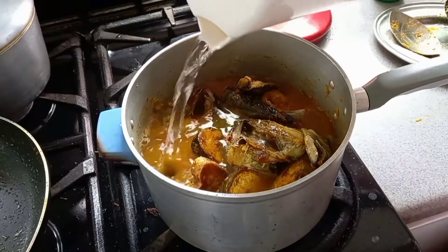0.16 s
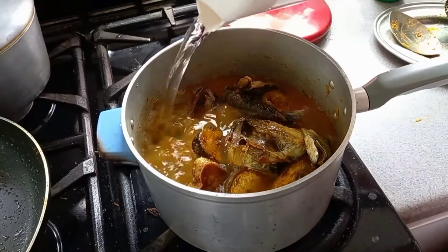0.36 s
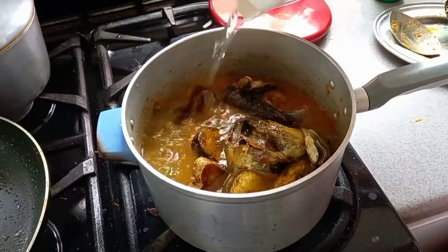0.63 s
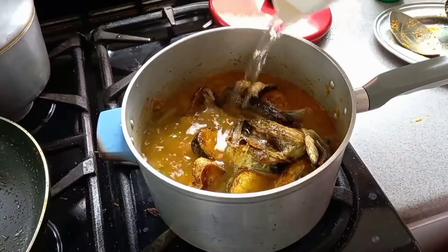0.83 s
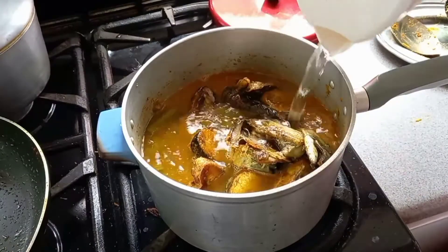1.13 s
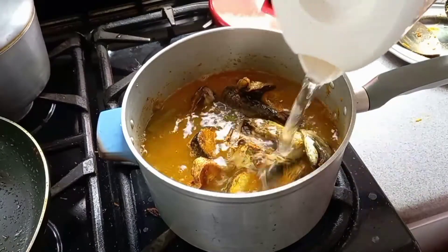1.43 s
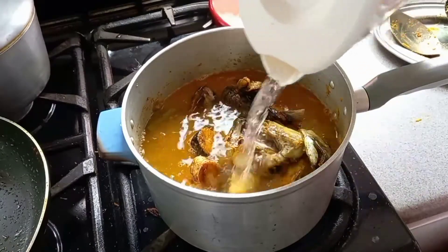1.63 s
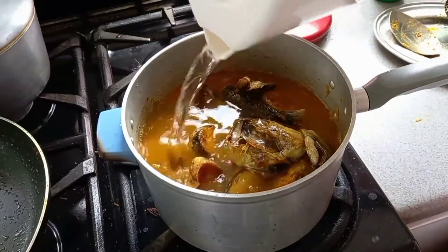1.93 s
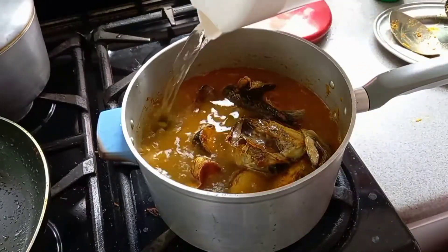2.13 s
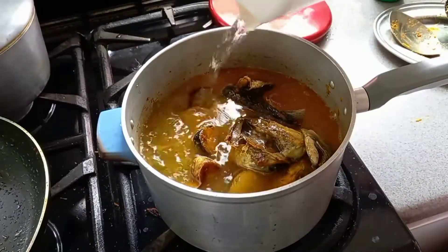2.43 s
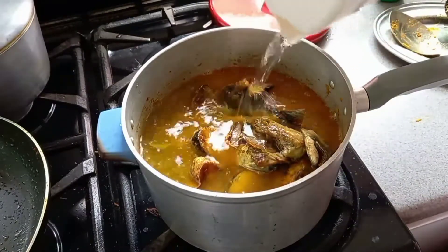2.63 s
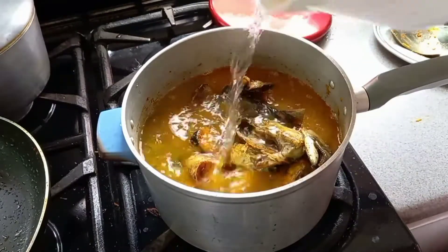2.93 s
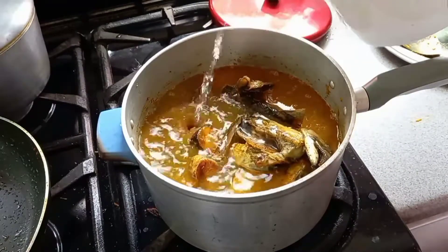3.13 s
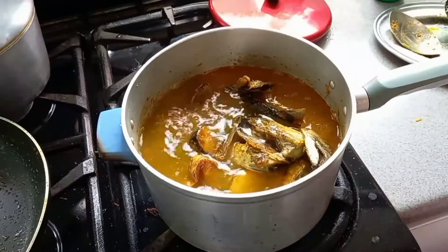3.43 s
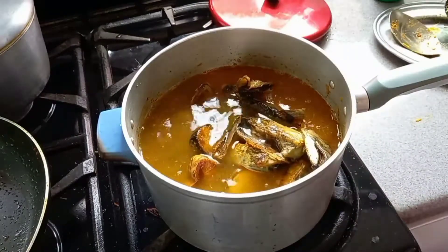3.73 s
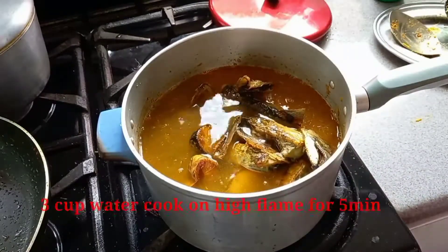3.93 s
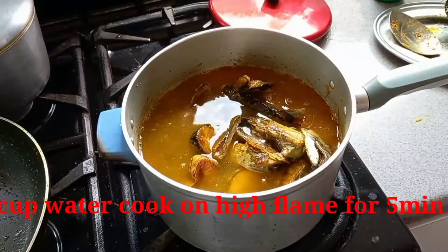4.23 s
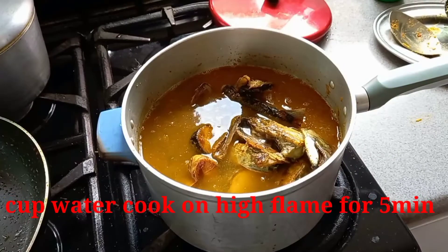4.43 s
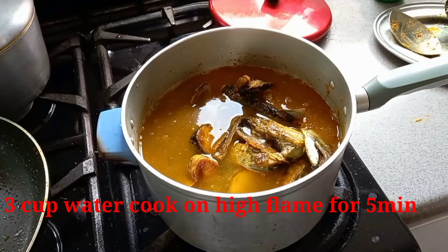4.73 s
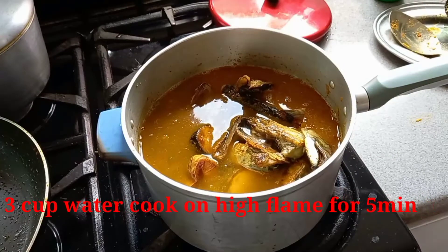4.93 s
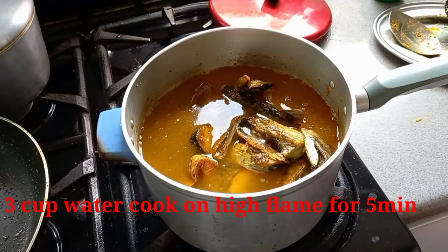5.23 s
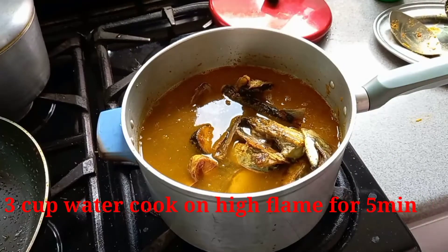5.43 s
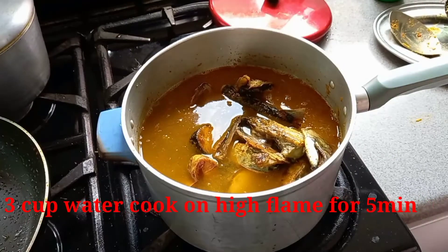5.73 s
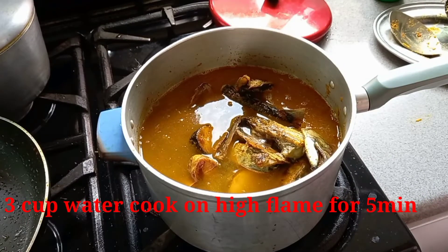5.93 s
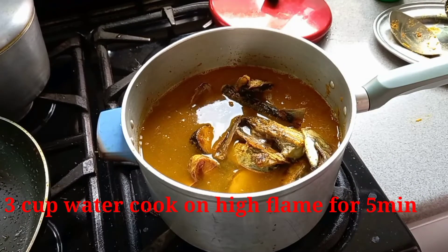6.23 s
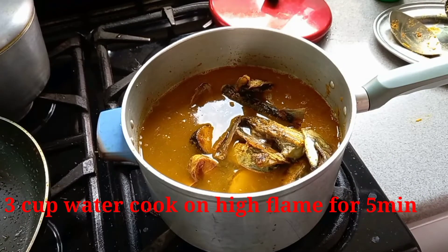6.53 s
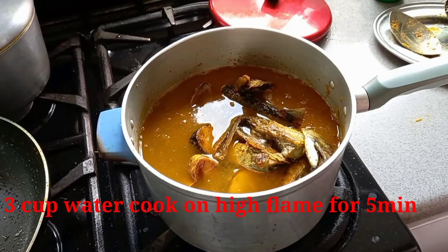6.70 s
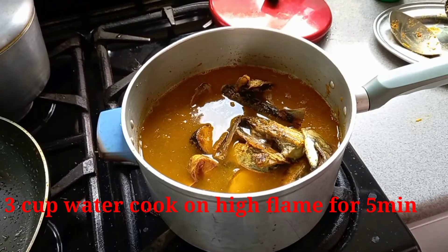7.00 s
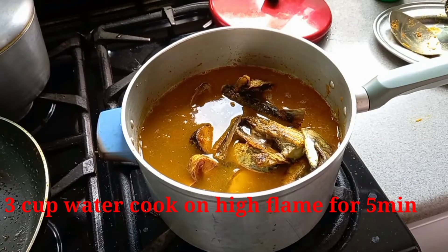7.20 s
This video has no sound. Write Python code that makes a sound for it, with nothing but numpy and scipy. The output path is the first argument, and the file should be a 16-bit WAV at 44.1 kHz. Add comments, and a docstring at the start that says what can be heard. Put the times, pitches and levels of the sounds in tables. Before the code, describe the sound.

Bubbly pouring into a metal pot for three seconds, then heavy knocks and short drags on a cupboard top, ending in light metallic clatter.

```python
"""Pouring water into a stew pot

A small hard kitchen, with two microphone ports a hand apart. A gas burner hisses under a metal pot of stew.
Water from a jug gurgles as pitched bubbles through the pot's air column and spits as short damped sines.
The stream stops; things are set down, dragged and knocked on a cupboard top nearby. Each knock is a brief
touch that rings the cupboard's modes, and the room answers it with a decaying noise tail."""
import sys
import numpy as np
from scipy import signal
from scipy.fft import rfft, irfft, next_fast_len
from scipy.io import wavfile
from scipy.ndimage import uniform_filter1d, map_coordinates

SR = 44100
rng = np.random.default_rng(int(sys.argv[2]) if len(sys.argv) > 2 else 0)


def digitize_waveform(pressure):
    """Quantize a signal to 16-bit integers and store it at the path in sys.argv[1].

    Rows of a 2-D input are taken as channels; values are limited to [-1, 1].
    """
    field = np.atleast_2d(pressure).T
    bounded = np.clip(field, -1, 1)
    quanta = np.round(bounded * 32767).astype(np.int16)
    wavfile.write(sys.argv[1], SR, quanta)


N = 324576  # samples, 7.36 s


def amp(db):
    """Decibels become an amplitude factor."""
    return 10 ** (np.asarray(db) / 20)


def unit(x):
    """Scale to rms 1."""
    return x / np.sqrt(np.mean(x ** 2) + 1e-20)


def along(points, hz):
    """Read a curve of (Hz, value) points on a log frequency axis."""
    point_hz, value = np.transpose(points)
    return np.interp(np.log(hz + 1), np.log(point_hz + 1), value)


def curves(rows, outside=None):
    """One value per sample for each column after the time."""
    seconds, *columns = np.transpose(rows)
    t = np.arange(N) / SR
    return [np.interp(t, seconds, column, outside, outside) for column in columns]


def wobble(rate):
    """A smooth random curve, rate knots a second."""
    knots = rng.standard_normal(int(N * rate / SR) + 4)
    return map_coordinates(knots, [np.arange(N) * rate / SR])


def filtered(x, response):
    """Pass x through a complex response of frequency."""
    length = x.shape[-1]
    padded = next_fast_len(length + 8192)
    spectrum = rfft(x, padded) * response(np.fft.rfftfreq(padded, 1 / SR))
    return irfft(spectrum, padded)[..., :length]


def modes(table):
    """The causal response of (Hz, width in Hz, dB) resonances, added with alternating sign."""
    def response(f):
        total = 0
        for k, (centre, width, db) in enumerate(table):
            damping = 1j * f * width
            total = total + (-1) ** k * amp(db) * damping / (centre * centre - f * f + damping)
        return total
    return response


# Likeness of the two ports for near and steady sounds.
# Each row: frequency in Hz, left-right likeness from 0 to 1.
NEAR_LIKENESS = [(60, 0.84), (190, 0.89), (340, 0.79), (600, 1), (1100, 1), (10000, 0.99)]


def spread(pair, likeness=NEAR_LIKENESS):
    """Mix two unrelated signals into left and right, as alike at each frequency as the table says."""
    def mid_and_side(hz):
        turn = np.arccos(np.clip(along(likeness, hz), -1, 1)) / 2
        return np.array([np.cos(turn), np.sin(turn)])
    mid, side = filtered(pair, mid_and_side)
    return np.array([mid + side, mid - side])


def rush(gain, patchy_db):
    """Stereo noise of rms 1 with patches of random gain in time and frequency."""
    z = signal.stft(rng.standard_normal((2, N)), nperseg=512)[2]
    field = rng.standard_normal(z.shape[1:])
    field = uniform_filter1d(uniform_filter1d(field, size=6, axis=0), size=6, axis=1)
    pair = signal.istft(z * amp(patchy_db * unit(field)), nperseg=512)[1][:, :N]
    return unit(spread(filtered(pair, gain)))


# How fast the kitchen's answer dies away. Each row: frequency in Hz, main decay by 60 dB in seconds.
ROOM_DECAY = [(60, 0.55), (250, 0.28), (1000, 0.29), (4000, 0.31), (12000, 0.24)]
# Likeness of the two ports in the room tail. Each row: frequency in Hz, left-right likeness from 0 to 1.
TAIL_LIKENESS = [(60, .995), (150, .92), (300, .8), (600, .35), (1500, .15), (10000, .1)]


def tail(seconds):
    """A fresh stereo room tail; each frequency dies at its own speed, and a fainter, slower part follows."""
    hz, t, z = signal.stft(rng.standard_normal((2, round(seconds * SR))), SR, nperseg=256)
    fall_db = -60 * t / along(ROOM_DECAY, hz)[:, None]
    decay = amp(fall_db) + amp(-28 + 0.44 * fall_db)
    x = spread(signal.istft(z * decay, SR, nperseg=256)[1], TAIL_LIKENESS)
    return x / np.linalg.norm(x[0])


# The gas jet over time. Each row: time in seconds, level in dB.
JET_LEVEL = [(0, -50), (4.8, -49.5), (6.4, -52), (7.36, -52)]
# The bands in which the jet whistles under the pot. Each row: centre in Hz, width in Hz, relative level in dB.
JET_BANDS = [(759, 110, -5), (1320, 120, -7.5), (1440, 18, 3.5), (1530, 90, -7), (1679, 57, 4),
             (1820, 147, -4), (3310, 850, -8.5), (4410, 33, -2), (4563, 54, -3.5), (5240, 34, -0.5),
             (5380, 26, -6.5), (5650, 180, -8), (8125, 100, 0.5), (8380, 49, -2), (9780, 1240, -12),
             (12500, 430, -8.5)]
# Colour of the broad flame and room noise. Each row: frequency in Hz, relative level in dB per Hz.
HISS_COLOUR = [(18, -52), (30, -18), (66, -5.5), (294, -11), (402, -13.5), (551, -21), (1420, -13.5),
               (1530, -15.5), (1700, -7), (2460, -31), (4490, -18), (6480, -16), (8420, -15.5),
               (13900, -27.5), (15800, -16)]


def burner():
    """The gas jet whistles faintly in fixed bands above a broad, steady hiss."""
    jet = rush(lambda hz: np.abs(modes(JET_BANDS)(hz)), patchy_db=2.42)
    hiss = rush(lambda hz: amp(along(HISS_COLOUR, hz)), patchy_db=1.0)
    return amp(curves(JET_LEVEL)[0]) * jet + amp(-52.5) * hiss


def blips(s, size, hz, cycles, rise):
    """Damped sines whose pitch climbs as the bubble nears the surface."""
    k = np.arange(700)  # samples, 16 ms
    age = k * (hz / cycles / SR)[:, None]  # in lifetimes
    tone = np.sin(2 * np.pi * cycles[:, None] * age * (1 + rise * age / 2))
    wave = size[:, None] * tone * np.exp(-3 * age) * (1 - np.exp(-12 * age))
    at = (s * SR).astype(int)[:, None] + k
    return np.bincount(at.ravel(), wave.ravel(), N + SR)[:N]


# The stream from the jug. Each row: time in seconds, gurgle in dB, spray in dB.
POUR_LEVELS = [(0.0, -55.5, -54), (0.59, -53, -55), (0.72, -63.5, -55), (0.8, -55, -53.5), (1.53, -64, -65),
               (1.69, -52, -56), (1.92, -67, -65), (1.95, -64, -49.5), (2.07, -53, -56.5),
               (2.41, -65.5, -68), (2.52, -54, -56), (2.55, -67, -78), (3.01, -61.5, -49), (3.12, -60, -62),
               (3.16, -89, -60), (3.27, -66, -48), (3.3, -69, -60), (3.45, -55.5, -65)]
POUR_END = POUR_LEVELS[-1][0]  # s


def swarm(count, centre_hz, octaves, cycles, scatter_db):
    """Random bubbles spread evenly through the pour, rms 1 over its length."""
    start, detune = rng.random(count) * POUR_END, rng.standard_normal(count)
    loudness = np.minimum(rng.exponential(size=count), 3.5)
    hz = np.clip(centre_hz * 2 ** (octaves * detune), 300, 15000)
    x = blips(start, amp(scatter_db * loudness), hz, np.full(count, cycles), rise=0.43)
    return x / np.sqrt(np.sum(x ** 2) / (POUR_END * SR))


# Single bubbles that stand out. Each row: start in seconds, level in dB, starting pitch in Hz.
LOUD_BUBBLES = [(0.009, -28.5, 1270), (0.078, -37, 1160), (0.318, -34, 2870), (0.372, -34, 746),
                (0.378, -27, 1200), (0.381, -23, 1900), (0.411, -27, 1890), (0.414, -31, 670),
                (0.459, -35, 660), (0.52, -35, 751), (0.541, -32, 666), (0.583, -28, 640),
                (0.603, -31, 1450), (0.625, -38, 700), (0.688, -46, 1670), (0.801, -38, 730),
                (1.035, -33, 2280), (1.056, -39, 759), (1.087, -22.5, 2520), (1.531, -35, 2400),
                (1.619, -29, 1580), (1.68, -30, 1430), (1.739, -34, 4020), (1.941, -34, 1460),
                (1.987, -30, 1320), (2.035, -37, 3440), (2.149, -36, 5010), (2.191, -39, 730),
                (2.217, -36, 746), (2.477, -37, 707), (2.638, -49, 1670), (2.727, -25, 2840),
                (3.035, -28.5, 2250), (3.182, -29, 5300), (3.19, -48, 1800), (3.231, -32, 1000),
                (3.253, -33, 3330), (3.264, -35, 1050), (3.269, -22, 4580)]


def bubbles():
    """Single bubbles ring on their own; higher ones last more cycles."""
    s, db, hz = np.transpose(LOUD_BUBBLES)
    cycles = 10.5 * (hz / 1000) ** 0.35
    return blips(s, amp(db), hz, cycles, rise=0.065)


# Loud spits of the stream. Each row: start in seconds, level in dB, starting pitch in Hz.
LOUD_SPITS = [(0.1643, -30, 10000), (0.3356, -26.5, 8000), (0.7743, -31.5, 4250), (0.8093, -34, 4360),
              (1.0345, -31, 7900), (1.1638, -29, 8200), (1.3994, -32, 8400), (1.405, -30, 11400),
              (1.62, -36, 3450), (1.6776, -28, 8060), (1.778, -32, 8800), (1.8597, -31, 9400),
              (1.9355, -28, 9920), (2.0203, -32, 4160), (2.1036, -32, 5140), (2.2933, -28, 8650),
              (2.4766, -26, 8450), (2.669, -37, 13500), (2.6998, -26, 9000), (2.7428, -26, 5650),
              (2.765, -23, 13900), (2.7885, -31.5, 5530), (2.793, -37, 13000), (2.8706, -33, 8240),
              (2.874, -31, 11500), (2.9866, -35, 4180), (3.0824, -38, 3830), (3.176, -31, 14800),
              (3.197, -34, 11000), (3.202, -32, 5640), (3.2455, -27, 12500), (3.268, -25.5, 6750),
              (3.2685, -17, 13200), (3.2745, -33, 9000), (3.3335, -28, 11600), (3.3345, -29, 8250)]


def spits():
    """A drop snaps, rings and scatters three short blips around its pitch within 2 ms; fainter ones fall at random."""
    u, z = rng.random(16), rng.standard_normal((16, 2))
    faint_hz = np.clip(7500 * 2 ** (0.43 * z[:, 1]), 2000, 13000)
    faint = np.transpose([u * POUR_END, -36 + 0.44 * z[:, 0], faint_hz])
    s, db, hz = np.transpose(np.vstack([LOUD_SPITS, faint]))
    cycles = np.full(len(s), 13)
    ring = blips(s, amp(db), hz, cycles, rise=0.092)
    snap = blips(s, amp(db + 3.5), hz, np.full(len(s), 1.7), rise=0.089)  # so short that it is broad
    x = ring + snap
    # the scattered blips lie somewhat below or above the drop's pitch
    for delay, detune in np.transpose(rng.random((len(s), 3, 2)), (1, 2, 0)):
        octaves = 0.51 * (2 * detune - 1 + 0.32)
        scattered_hz = np.minimum(hz * 2 ** octaves, 15300)
        x = x + blips(s + 0.0018 * delay, amp(db + 3 - 0.99 * delay), scattered_hz, cycles, rise=0.49)
    return x


# Air column above the stew. Each row: centre in Hz, width in Hz, relative level in dB.
POT_AIR = [(720, 210, -4), (1414, 116, 0.5), (387, 300, -30)]


def water():
    """Large bubbles sound through the pot's air, small ones and spray come straight; the pot's floor drums."""
    gurgle_db, spray_db = curves(POUR_LEVELS, outside=-120)
    splash_db = spray_db + 2 + 3 * wobble(8.46)
    clumped_db = spray_db + 2.5 * wobble(22)  # the spray comes in clumps
    # the drumming grows no more once the gurgle passes -58 dB
    drumming_db = np.minimum(gurgle_db, -58) - 5 + 1.5 * wobble(5.14)

    gurgle = swarm(count=1000, centre_hz=852, octaves=0.504, cycles=5.4, scatter_db=1.5)
    splash = swarm(count=900, centre_hz=3700, octaves=0.47, cycles=6.3, scatter_db=3.0)
    spray = swarm(count=2200, centre_hz=8500, octaves=0.6, cycles=5.0, scatter_db=3.5)
    through_pot = unit(filtered(gurgle, modes(POT_AIR)))
    x = amp(gurgle_db) * (0.44 * gurgle + 1.1 * through_pot)
    x = x + amp(splash_db) * splash + amp(clumped_db) * spray + bubbles() + spits()

    near = spread(np.array([x, np.roll(x, 9)]))  # a copy 0.2 ms later gives the stream its width
    room = signal.fftconvolve(x[None], tail(0.27), axes=1)[:, :N]
    floor = rush(lambda hz: np.abs(modes([(150, 180, 0)])(hz)), patchy_db=0.0)
    return amp(-5.5) * near + amp(-8) * room + amp(drumming_db) * floor


def causal(db, size=16384):
    """The minimum-phase impulse response of a level in dB as a function of frequency."""
    cepstrum = irfft(db(np.fft.rfftfreq(size, 1 / SR)) * np.log(10) / 20, size)
    cepstrum[1:size // 2] *= 2
    cepstrum[size // 2 + 1:] = 0
    return irfft(np.exp(rfft(cepstrum)), size)


# Resonances of the cupboard. Each row: centre in Hz, width in Hz, relative level in dB.
CUPBOARD = [(52.5, 10, 13.5), (69.4, 11, 6.5), (110.7, 12.4, 7), (248, 19, 3), (349.6, 22, 4), (452, 29, 1),
            (579, 25, -2.5), (736.5, 28, 1.5), (866, 29, 0), (1080, 12, 3.5), (1268, 43, -5), (1500, 45, 0),
            (1958, 13, 0), (2146, 52, 3), (2347, 40, -6.5), (2600, 115, 4.5)]
# A loose panel of it, woken by some blows more than others.
# Each row: centre in Hz, width in Hz, relative level in dB.
LOOSE_PANEL = [(227, 9, 13.5), (389, 7.1, 7)]
# Colour of the room's answer over the direct blow. Each row: frequency in Hz, relative level in dB.
ROOM_COLOUR = [(60, -6), (130, -6), (250, -2), (500, 1.5), (1000, 3.5), (8000, 9.5)]


def strike(colour_db, contact, ring_db, own, room_db):
    """A push and a crackle as long as the touch ring the cupboard, and the room fills while it lasts."""
    t, contact = np.arange(SR // 8) / SR, max(contact, 0.0003)
    # each port hears its own crackle
    crackle = t / contact * np.exp(-t / contact) * rng.standard_normal((2, len(t)))
    crackle = crackle / np.linalg.norm(crackle[0])
    # below 500 Hz the touch is mostly a single push, above it many small ones
    touch = filtered(crackle, lambda hz: 1j * hz / (500 + 1j * hz))
    touch = touch + filtered(t == 0, lambda hz: 500 / (500 + 1j * hz))

    woken = sorted(CUPBOARD + own + [(hz, width, db + ring_db) for hz, width, db in LOOSE_PANEL])
    uneven_db = 2 * rng.standard_normal(len(woken))  # each blow wakes the modes unevenly
    woken = [(hz, width, db + extra) for (hz, width, db), extra in zip(woken, uneven_db)]
    body = filtered(causal(colour_db), lambda hz: 0.69 + modes(woken)(hz))

    room = tail(0.5)
    late = np.arange(room.shape[1]) / SR
    # echoes come back unevenly, in 3 ms lumps
    lumps = np.repeat(rng.standard_normal(len(late) // 128 + 1), 128)[:len(late)]
    fill = (1 - np.exp(-late / (2.16 * contact))) ** 2
    room = room * fill * amp(room_db + 2.5 * lumps)
    sent = filtered(body, lambda hz: amp(along(ROOM_COLOUR, hz)))
    heard = signal.fftconvolve(sent[None], room, axes=1)

    swell = 1 - np.exp(-np.arange(len(body)) / SR / (0.54 * contact))  # a soft touch builds up
    direct = signal.fftconvolve(touch, body[None], axes=1)[:, :len(body)]
    heard[:, :len(body)] += swell * direct
    return heard


# Things set down and knocked on the cupboard top. Each row: start in seconds, weight in dB, knock in dB,
# hardness in Hz above which it dulls, contact in seconds, ring of the loose panel in dB,
# the thing's own pitch in Hz, its own ring in dB, room in dB.
SET_DOWN = [(3.7579, -42, -9, 980, 0.00099, -4, 586, -15, 0.5),
            (4.437, 28.5, -2, 1050, 0.0088, -3, 615, -2, 2.5), (4.467, 12, -12, 700, .0022, -3, 600, 6, -1),
            (4.499, 18, -20, 600, 0.0019, 3, 595, 3, -5), (4.5338, 14, -15, 900, 0.0041, -3, 600, 2, -3),
            (4.635, 17, 9.5, 800, 0.001, -1, 816, 0, 1),
            (4.6441, 29.5, 19.5, 524, 0.0016, -6.5, 415, 3, -3.5),
            (4.657, 27, 17.5, 504, 0.002, -9, 2310, 26, -6.5),
            (4.676, 11, 6, 450, 0.0031, -10, 2320, 34, -11),
            (4.733, 19.5, -3, 450, 0.0024, -5, 297, -1, -1),
            (4.9147, 5, 9, 2570, 0.00099, -3.5, 2600, 7.5, 0.5),
            (4.927, -1, 1, 2680, .001, -8, 2600, 11.5, 0), (4.944, -2, 9, 600, 0.002, -4.5, 600, 2, -0.5),
            (4.974, 10, 6.5, 950, 0.0012, 1, 851, 8, -6), (5.0264, 15, 11.5, 650, 0.004, 2, 680, 6, -4),
            (5.037, 5, 10, 600, .003, -3, 580, 1.5, -4),
            (5.045, 4, -2.5, 1220, 0.00076, -1, 2370, 21.5, -10),
            (5.075, 11, -16, 497, .003, 12.5, 600, 2, 1.5), (5.1665, -22, 2, 650, 0.003, 0.5, 735, 16, -20),
            (5.174, -20, 3, 596, .003, 2, 732, 14, -1), (5.186, -27, 3, 605, 0.0026, -1.5, 748, 12.5, -12),
            (5.208, -14, -3, 644, 0.003, -12, 732, 16, -14), (5.217, -24, -2, 650, 0.0026, -8, 730, 13, 0),
            (5.4012, -15, -2.5, 450, 0.0013, -4, 241, 5, 2),
            (5.4573, -29, -2, 1930, 0.00048, -6, 433, 14, 0),
            (5.5306, -34, -6, 1500, 0.00082, -14, 616, -7, 0.5),
            (5.6378, 4, 0.5, 650, 0.0021, -11, 392, 13, -1.5),
            (5.645, -30, -12.5, 1900, 0.0029, -10, 1600, 5, -0.5),
            (5.656, 10.5, -4, 330, 0.0014, -12, 300, -2, 0),
            (5.6823, -7, -10, 350, 0.0017, -14, 300, -3, 4),
            (5.8113, 4, -2.5, 1100, 0.0051, 1.5, 643, 5.5, 6),
            (5.9497, -7, -3, 2920, 0.00055, -1, 1310, 5, 1), (5.985, -20, -1, 500, 0.0035, 1, 324, 3, -8),
            (6.066, -35, -14, 1200, 0.0025, -22, 920, 16.5, -1),
            (6.099, -32, -19, 1600, 0.0023, -15, 1470, 15, -1), ]
# The weight landing. Each row: frequency in Hz, relative level in dB per Hz.
THUD_COLOUR = [(35, -28), (80, -1), (160, -18), (320, -38), (1000, -80)]
# A hard knock before any dulling. Each row: frequency in Hz, relative level in dB per Hz.
KNOCK_COLOUR = [(35, -48), (150, -1.5), (320, 2), (1200, 2), (2700, -1), (3600, -3), (6000, 5.5),
                (15500, 19)]
# Light metal clacks; the row at 4.914 s is the bright part of the knock there. Each row: start in seconds,
# level in dB, tilt in dB per octave, contact in seconds.
METAL_CLACKS = [(4.914, -15, 1.5, 0.00063), (5.8092, 0.5, 0.1, 0.0013), (6.7437, -6, -1, 0.0034),
                (6.903, -6.5, 0, 0.0019), (6.9244, 2, -3, 0.0031), (6.931, 4, 0, 0.0023),
                (6.9376, -1, 2.5, 0.0016), (6.947, -6, 4.5, 0.003), (7.0394, -5, -1, 0.01),
                (7.12, -14, 0, 0.0018)]
# Colour of a clack before its tilt. Each row: frequency in Hz, relative level in dB per Hz.
CLACK_COLOUR = [(35, -55), (80, -44), (320, -11), (950, -1), (2000, 0.5), (3000, 0.5), (4000, 0),
                (6000, -4.5), (10000, 2), (13000, -3), (15500, -8)]


def knocks():
    """Heavy things thud, soft ones knock dully, light metal clacks."""
    out, hits = np.zeros((2, N + SR)), []
    for s, weight_db, knock_db, hard_hz, contact, ring_db, own_hz, own_db, room_db in SET_DOWN:
        def colour(hz):
            # 18.5 dB per octave above the hardness, down to a faint crack
            dull = amp(-18.5 * np.log2(1 + (hz / hard_hz) ** 4) / 4) + amp(-51.5)
            thud = amp(weight_db + along(THUD_COLOUR, hz))
            return 20 * np.log10(thud + amp(knock_db + along(KNOCK_COLOUR, hz)) * dull)
        own = [(own_hz, 0.054 * own_hz, own_db)]
        hits.append((s, strike(colour, contact, ring_db, own, room_db)))
    for s, db, tilt_db, contact in METAL_CLACKS:
        def colour(hz):
            return db + along(CLACK_COLOUR, hz) + tilt_db * np.log2((hz + 30) / 2500)
        hits.append((s, strike(colour, contact, ring_db=1.5, own=[], room_db=0)))
    for s, heard in hits:
        out[:, round(s * SR):][:, :heard.shape[1]] += heard
    return out[:, :N]


# Things sliding on the cupboard top. Each row: start in seconds, length in seconds, rasp in dB, groan in dB.
SLIDES = [(4.055, 0.18, -48.5, -82), (4.892, 0.022, -54, -40.5), (5.103, 0.099, -59, -47),
          (5.257, 0.17, -53.5, -46), (5.52, 0.034, -55, -64)]
# Colour of the rasp on the surface. Each row: frequency in Hz, relative level in dB per Hz.
RASP_COLOUR = [(500, -51), (1000, 4), (2200, 2), (5000, -7), (12000, -6.5), (16000, -16)]


def drags():
    """Something slides: a rasp on the surface and a groan in the cupboard's modes."""
    t = np.arange(N) / SR
    rasp, groan = np.zeros(N), np.zeros(N)
    for s, length, rasp_db, groan_db in SLIDES:
        # full while it slides; swells by 20 dB per 0.04 s before, fades by 20 dB per 0.06 s after
        edges = np.minimum((t - s) / 0.04, (s + length - t) / 0.06)
        slide = amp(20 * np.clip(edges, -6, 0))
        rasp += amp(rasp_db) * slide
        groan += amp(groan_db) * slide
    groaning = sorted(CUPBOARD[4:9] + LOOSE_PANEL)
    surface = rush(lambda hz: amp(along(RASP_COLOUR, hz)), patchy_db=1.5)
    cupboard = rush(lambda hz: np.abs(modes(groaning)(hz)), patchy_db=4.0)
    return rasp * surface + groan * cupboard


def scene():
    """Burner, pour, knocks and slides together in the kitchen."""
    return burner() + water() + knocks() + drags()


# Level balance of the two ports. Each row: frequency in Hz, left minus right in dB.
PORT_BALANCE = [(60, 3), (180, -1.5), (600, -0.5), (2000, 1), (5000, 1.5), (9000, -3.5), (14000, 3)]
# Phase between the ports. Each row: frequency in Hz, lead of the left port in radians.
PORT_LEAD = [(300, 0.027), (700, 1.05), (1100, 1.306), (15000, 1.65)]


def record(dry):
    """Two ports a hand apart, out of step in the treble; no deep bass, nothing above the band limit."""
    def microphone(hz):
        balance = amp(np.outer([0.5, -0.5], along(PORT_BALANCE, hz)))
        lead = np.exp(np.outer([0.5j, -0.5j], along(PORT_LEAD, hz)))
        low_cut = np.sqrt(1 + (42 / (hz + 1)) ** 8)
        return balance * lead * (hz < 15700) / low_cut
    return filtered(dry, microphone)


dry = scene()
out = record(dry)
digitize_waveform(out)
```